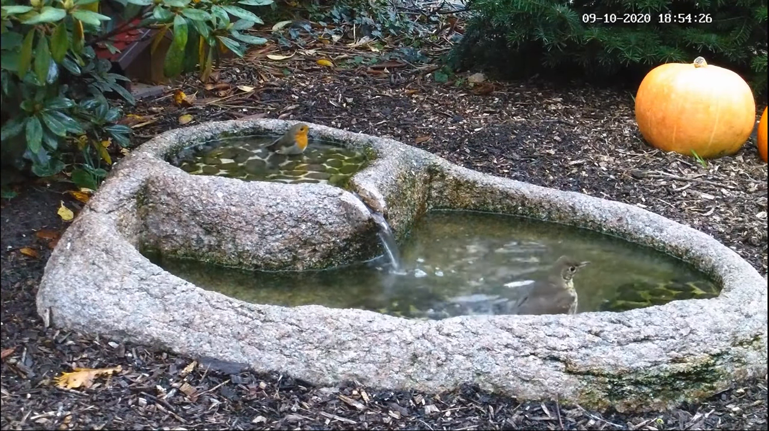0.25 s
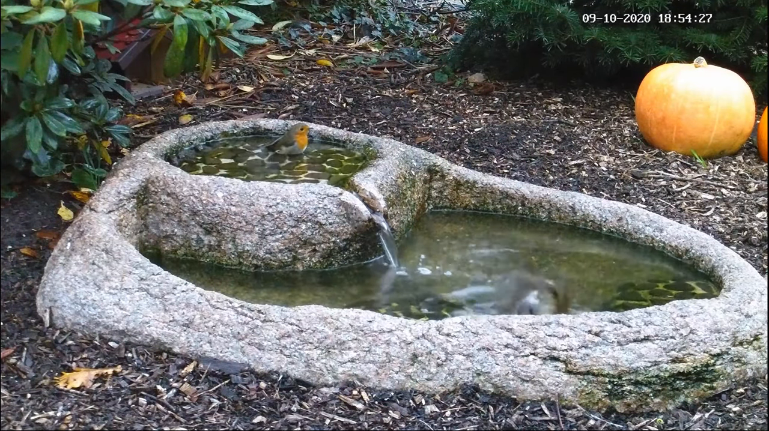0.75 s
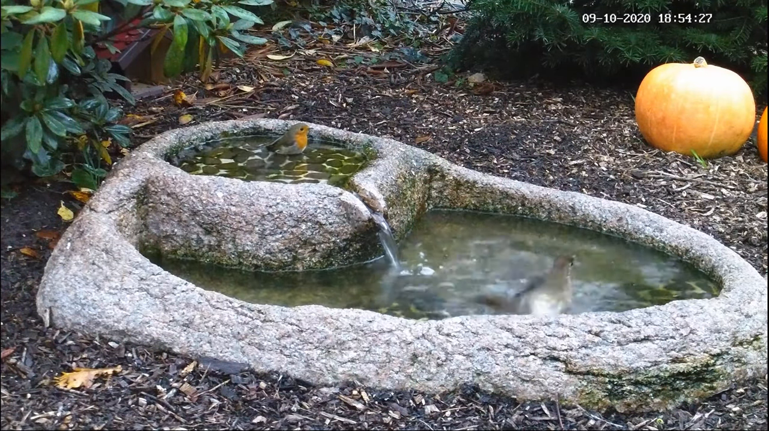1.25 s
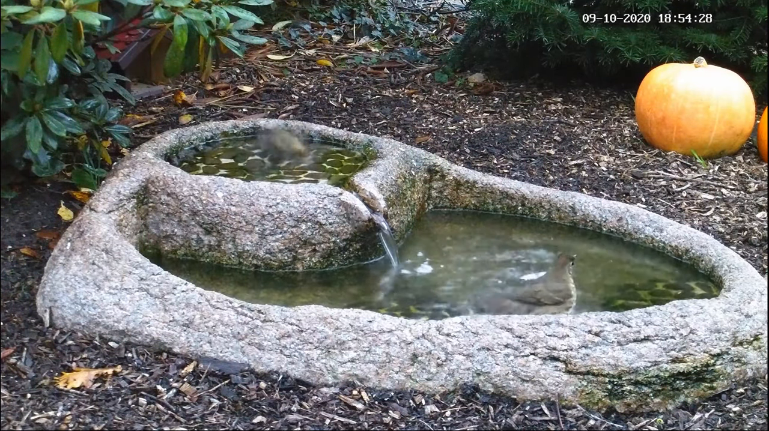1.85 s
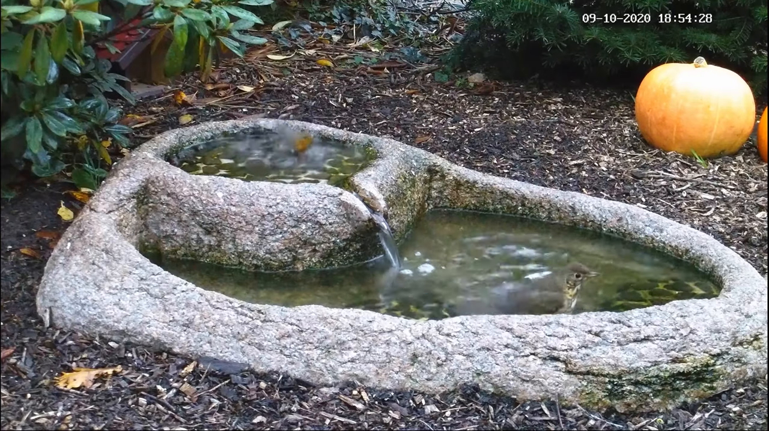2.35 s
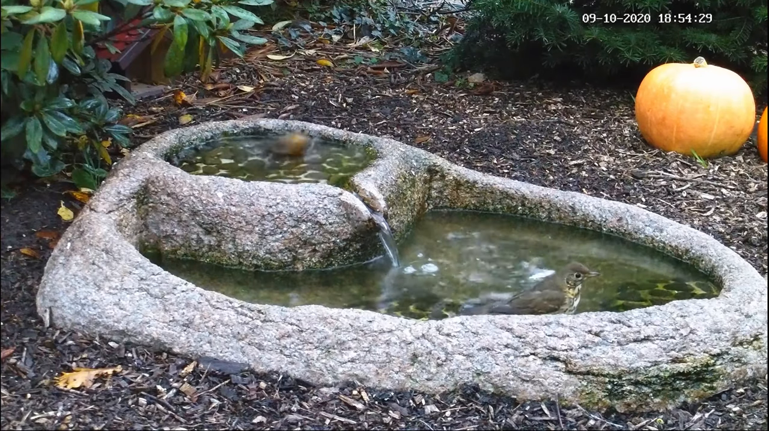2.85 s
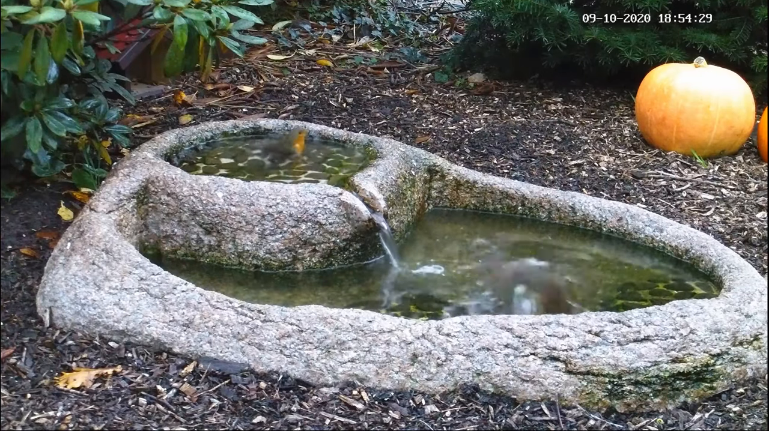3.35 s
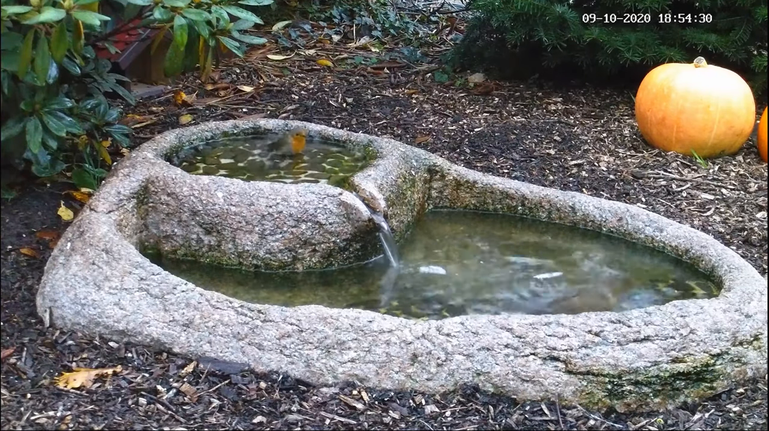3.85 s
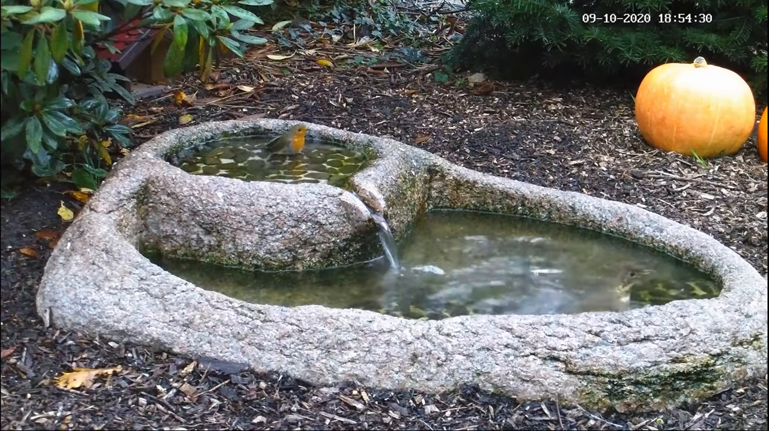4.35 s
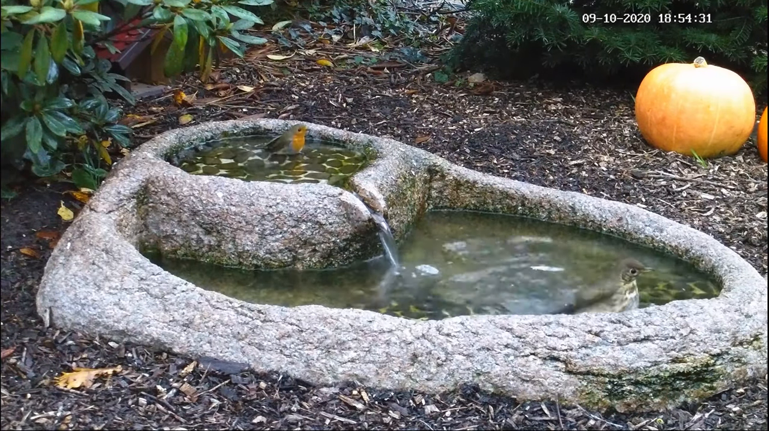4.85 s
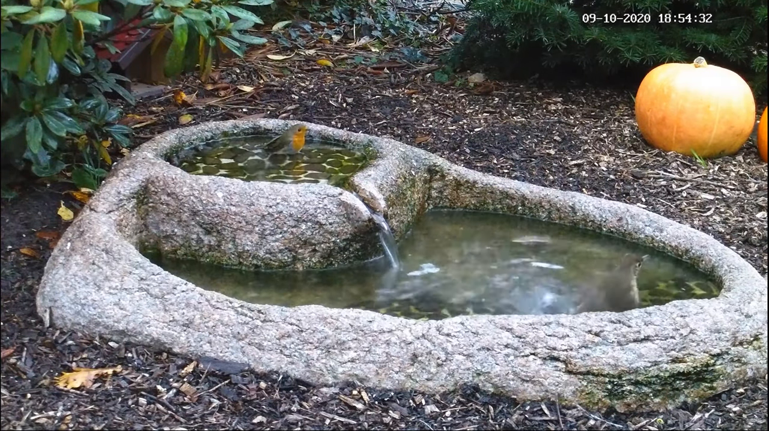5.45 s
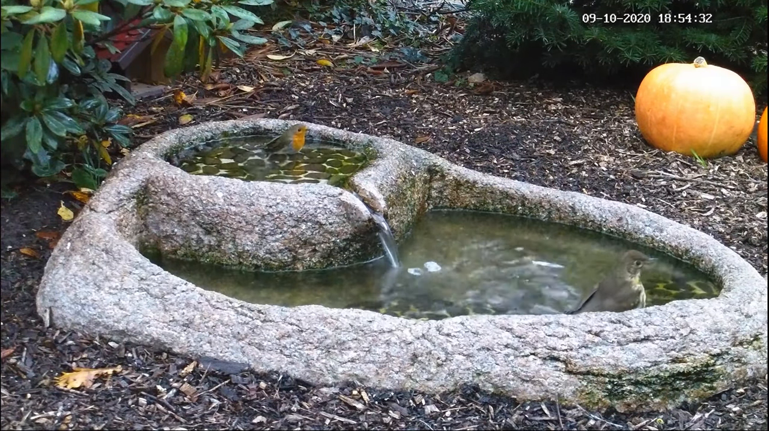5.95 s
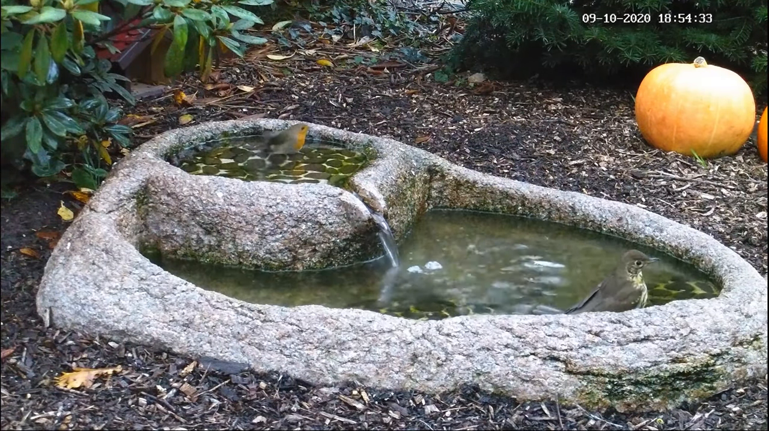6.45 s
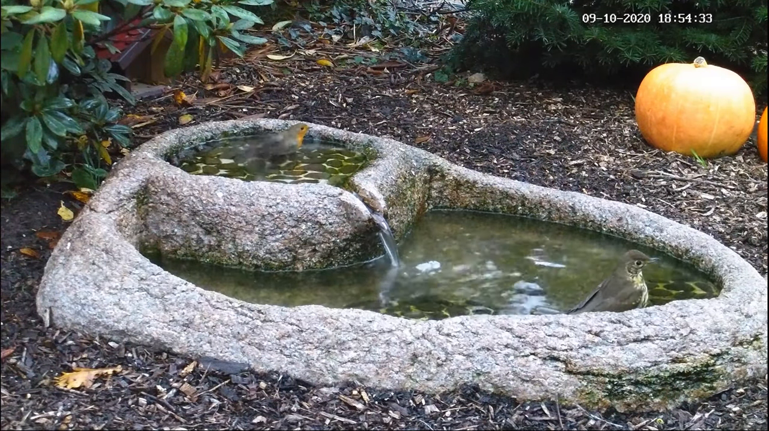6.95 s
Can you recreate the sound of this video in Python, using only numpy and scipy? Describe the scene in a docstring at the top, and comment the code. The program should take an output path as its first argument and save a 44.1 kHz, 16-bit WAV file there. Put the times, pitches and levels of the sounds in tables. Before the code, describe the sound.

Close, steady trickle from a small spout into a stone basin, with ringing plops, crisp ticks and small gurgling bubbles. A bird bathes in short bouts, its wings slapping the water in quick runs, throwing hissing spray and froth, strongest around four seconds. Between bouts only the trickle remains, over soft low traffic rumble and faint bird whistles. Outdoor garden, slightly coloured small camera microphone.

```python
"""Garden, stone bird bath: a thin stream falls from a spout, plopping and ticking, while a bird bathes in bouts.
Stream: ringing bubbles, sharp ticks of noise and ring, rising blips. Bird: noise slaps, spray, froth, sloshes.
Behind: filtered-noise traffic, one engine gaining speed, beating hum tones, faint whistled birds.
Basin echoes the water; a small camera housing colours everything through resonances and a steep low-pass."""
import sys
import numpy as np
from scipy import signal
from scipy.fft import rfft, irfft, next_fast_len
from scipy.io import wavfile
from scipy.ndimage import uniform_filter1d

SR = 44100
rng = np.random.default_rng(int(sys.argv[2]) if len(sys.argv) > 2 else 0)


def dump(signal):
    """Clip the signal to [-1, 1] and save it as 16-bit WAV at the path in sys.argv[1]."""
    limited = np.clip(np.atleast_2d(signal).T, -1, 1)
    pcm = np.round(limited * 32767).astype(np.int16)
    wavfile.write(sys.argv[1], SR, pcm)


N = 317961
TIME = np.arange(N) / SR


def undb(db):
    """Decibels to gain."""
    return 10 ** (np.asarray(db) / 20)


def level(x, db):
    """Set the rms level."""
    return x * undb(db) / np.sqrt(np.mean(x ** 2))


def add(out, t_s, x):
    """Mix x into out at time t_s."""
    i = int(np.clip(t_s * SR, 0, N))
    out[i:i + len(x)] += x[:N - i]


def noise(count=N):
    """White noise."""
    return rng.standard_normal(count)


def walk(rate_hz):
    """Slow random drift with a spread near 1."""
    hold = int(SR / rate_hz)
    steps = np.repeat(noise(N // hold + 1), hold)
    return 1.6 * uniform_filter1d(steps, hold)[:N]


def tone(hz):
    """Sine following a pitch track."""
    return np.sin(2 * np.pi * np.cumsum(hz) / SR)


def butter(x, hz, kind, order=2):
    """Low- or high-pass."""
    return signal.sosfilt(signal.butter(order, hz, kind, fs=SR, output="sos"), x)


def colour(x, points):
    """Minimum-phase filter through f/Hz, gain/dB points."""
    hz, db = np.transpose(points)
    bins_hz = np.arange(N + 1) * SR / (2 * N)
    gain = undb(np.interp(np.log(bins_hz + 1), np.log(hz), db))
    # folded cepstrum makes the response causal
    cepstrum = irfft(np.log(gain))[:N]
    cepstrum[1:] *= 2
    size = next_fast_len(2 * N)
    return irfft(rfft(x, size) * np.exp(rfft(cepstrum, size)), size)[:N]


def echoes(x, t60_s):
    """Scattered reflections that die away, of unit energy."""
    t = TIME[:SR // 2]
    tail = noise(len(t)) * np.exp(-np.log(1000) * t / t60_s) * (1 - np.exp(-t / 0.0029))
    return signal.fftconvolve(x, tail / np.linalg.norm(tail))[:N]


def scatter(grain, per_s, low_hz, high_hz, spread_db):
    """Steady supply of grains at uneven times, of random pitch and strength, most of them weak."""
    out = np.zeros(N)
    for k, (when, size, strength) in enumerate(rng.random((int(per_s * N / SR) + 1, 3))):
        hz = low_hz * (high_hz / low_hz) ** size
        add(out, (k + when) / per_s, undb(spread_db * strength ** 2) * grain(hz))
    return out


def bubble(hz, cycles, glide, onset_cycles):
    """A ring, as of a bubble: swells, rings out over some cycles and slides in pitch."""
    age_cycles = np.arange(int(6 * cycles * SR / hz)) * hz / SR
    pitch_hz = hz * (1 + glide * (1 - np.exp(-age_cycles / (2 * cycles))))
    swell = (1 - np.exp(-(age_cycles / onset_cycles) ** 2)) * np.exp(-age_cycles / cycles)
    return swell / swell.max() * tone(pitch_hz)


PLOP_CLICK_DB = -7  # re bubble


def plop(hz):
    """A large bubble usually sags a little in pitch; the closing cavity gives a small wet click."""
    t = TIME[:SR // 20]
    out = undb(PLOP_CLICK_DB) * noise(len(t)) * np.exp(-t / 0.002)
    glide = -0.08 + 0.011 * rng.standard_normal()
    add(out, 0, bubble(hz * 1.027, cycles=8.9, glide=glide, onset_cycles=1.66)[:len(t)])
    return out


TICK_S = 0.0016  # crack decay


def drop(hz, cycles, crack_db):
    """A drop ticks: high-passed noise cracks while a short steady-pitched tone rings out."""
    t = TIME[:SR // 30]
    crack = noise(len(t)) * (1 - np.exp(-t / 0.0003)) * np.exp(-t / TICK_S)
    out = undb(crack_db) * butter(crack, min(hz * 0.69, 5500), "high", order=4)
    ring = bubble(hz, cycles, glide=0, onset_cycles=1.54)
    add(out, 0, ring[:len(t)])
    return out


# big air pockets pulled under: t/s, relative level/dB, f/Hz
PLOPS = [(0.0323, -47, 1990), (0.196, -42.5, 1940), (0.26, -32, 1430), (0.3836, -43, 1415),
         (0.5, -42.5, 1560), (1.096, -41, 1410), (1.4202, -43, 1430), (1.4676, -41, 1510),
         (1.6347, -43, 2110), (1.7996, -43.5, 1530), (2.0054, -38, 1414), (2.02, -39, 1990),
         (2.107, -37, 1525), (2.2334, -41, 2150), (2.265, -42, 1426), (2.412, -41.5, 2600),
         (2.5432, -41.5, 1476), (2.639, -46, 1493), (2.788, -43.5, 2100), (3.0522, -36.5, 1450),
         (3.3313, -40.5, 1560), (3.5243, -39, 1430), (3.6516, -40.5, 1880), (3.7624, -33.5, 1440),
         (4.2795, -34.5, 1480), (4.692, -34, 1730), (4.8273, -37.5, 1770), (4.8652, -40, 1850),
         (4.9157, -38, 1440), (5.4916, -39, 1960), (5.5344, -40, 1690), (5.5533, -39, 1500),
         (5.6425, -38, 1450), (5.8214, -41.5, 1400), (5.8782, -41, 2040), (5.9705, -44, 1432),
         (6.1765, -44, 2570), (6.1996, -42, 1490), (6.2263, -46, 1490), (6.3315, -40, 1450),
         (6.3767, -42.5, 2560), (6.5962, -37.5, 1410), (6.6742, -35, 2100), (6.6828, -40, 2300),
         (6.9528, -41.5, 1900)]


def plops():
    """The stream pulls big pockets of air under."""
    out = np.zeros(N)
    for t_s, db, hz in PLOPS:
        add(out, t_s, undb(db - 0.5) * plop(hz))
    return out


# sharp ticks, most from the heaviest drops; some thin high ticks sit close to the low-pass edge: # t/s,
# relative level/dB, f/Hz
TICKS = [(0.0131, -31, 9500), (0.1333, -29, 8750), (0.2242, -29.5, 9760), (0.5492, -39, 4000),
         (0.6479, -39, 3720), (0.8375, -29, 12400), (1.082, -30, 12000), (1.189, -25, 11600),
         (1.58, -32, 11800), (1.7025, -33, 7440), (1.8866, -32, 7470), (1.9287, -26.5, 12100),
         (1.955, -28, 11600), (2.1292, -33.5, 5070), (2.3122, -28, 7700), (2.4578, -29, 6000),
         (2.5253, -27.5, 12900), (2.85, -25.5, 10020), (2.9036, -31.5, 6700), (3.0124, -34, 7000),
         (3.1321, -23.5, 11000), (3.2193, -33, 9640), (3.2537, -23, 13200), (3.3954, -32.5, 3560),
         (3.4086, -29, 6070), (3.5398, -29, 6700), (3.8921, -27, 8360), (4.508, -33, 3850),
         (4.5278, -35, 5470), (4.7705, -32.5, 9300), (4.9374, -23, 12400), (5.3804, -27.5, 5760),
         (5.4834, -22, 7400), (5.76, -32, 6100), (5.784, -38, 4260), (5.8007, -36.5, 11860),
         (5.8454, -33.5, 7300), (5.9732, -31.5, 6110), (6.0278, -19.5, 12300), (6.0746, -29, 6000),
         (6.1345, -28, 7000), (6.1734, -32.5, 6200), (6.2351, -26.5, 12130), (6.307, -36.5, 4030),
         (6.3371, -33, 8070), (6.424, -27.5, 7770), (6.6313, -24, 11700), (6.6712, -26.5, 7420),
         (6.8028, -34, 5540), (6.9287, -29.5, 9450)]


def ticks():
    """Sharp ticks, most from the heaviest drops of the stream; each comes back once more off the near stone
    wall."""
    out = np.zeros(N)
    for t_s, db, hz in TICKS:
        sound = undb(db - 5) * drop(hz, cycles=11.8 * np.sqrt(hz / 8000), crack_db=0.5)
        add(out, t_s + 0.0004, sound)
        add(out, t_s + rng.uniform(0.0013, 0.0028), undb(0.5) * sound)
    return out


# clear rising bubbles: t/s, length/s, start f/Hz, end f/Hz, relative level/dB
BLIPS = [(0.11, 0.016, 2800, 5170, -38), (1.802, 0.031, 2040, 2760, -39), (1.827, 0.026, 2170, 2750, -35),
         (1.881, 0.024, 2240, 2880, -34.5), (2.62, .05, 1434, 1510, -35.5), (4.12, 0.013, 2100, 2460, -31),
         (4.734, 0.023, 3570, 4430, -33), (6.205, 0.081, 1480, 1495, -38),
         (6.516, 0.024, 1370, 1670, -33.5), (6.596, 0.017, 2540, 3270, -37), (6.638, .011, 4400, 5000, -31),
         (6.683, 0.018, 2340, 3480, -32), (6.725, 0.01, 2760, 3560, -30)]


def blips():
    """A bubble nearing the surface chirps upward."""
    out = np.zeros(N)
    for t_s, length_s, start_hz, end_hz, db in BLIPS:
        hz = np.geomspace(start_hz, end_hz, int(length_s * SR))
        add(out, t_s, undb(db - 14.5) * np.hanning(len(hz)) * tone(hz))
    return out


GURGLES_PER_S, TINKLES_PER_S = 26, 14
GURGLE_DB, TINKLE_DB = -65, -59  # rms


def gurgle_grain(hz):
    """Either a plop or a softer bubble without a click, at even odds."""
    if rng.random() < 0.5:
        return plop(hz)
    return bubble(hz, cycles=7.5, glide=rng.uniform(-0.1, 0.23), onset_cycles=1.4)


def tinkle_grain(hz):
    """A small drop with a stronger crack."""
    return drop(hz, cycles=5, crack_db=4)


def trickle():
    """Under the stream soft bubbles gurgle and small drops tick, at chance times."""
    gurgle = scatter(gurgle_grain, GURGLES_PER_S, low_hz=1393, high_hz=2740, spread_db=9)
    tinkle = scatter(tinkle_grain, TINKLES_PER_S, low_hz=4400, high_hz=10500, spread_db=9)
    return level(gurgle, GURGLE_DB) + level(tinkle, TINKLE_DB)


# wing beats: t/s, relative levels/dB of smack, cavity gulp, low thud
SLAPS = [(0.608, -30.5, -50, -60), (0.6902, -27, -60, -46), (0.848, -31, -45.5, -44.5),
         (1.132, -28, -41.5, -43), (1.2099, -28, -40.5, -43.5), (1.283, -23, -37.5, -41),
         (1.358, -24.5, -36.5, -38), (3.3662, -33, -59, -53), (3.453, -23.5, -59, -55),
         (3.485, -33.5, -46, -63), (4.0222, -25.5, -33.5, -36), (4.0953, -20, -32.5, -43.5),
         (4.1615, -21.5, -34, -43), (4.2296, -17.5, -33.5, -42), (4.303, -21, -30, -39),
         (4.3768, -22, -39, -43), (4.586, -37, -43, -43), (4.681, -22, -40.5, -43.5),
         (4.994, -31.5, -40, -46), (5.0603, -27, -39, -39), (5.1252, -23, -40.5, -42.5),
         (5.1943, -23.5, -39.5, -40.5), (5.2707, -26.5, -48, -43), (5.3505, -23.5, -38.5, -44),
         (5.447, -32.5, -47.5, -58), (7.1465, -42, -39, -57), (7.1942, -31.5, -46, -59)]
# smack and gulp spectrum: f/Hz, gain/dB
SLAP_COLOUR = [(590, -31), (1000, -27), (1150, -16), (1540, 2), (2370, -4), (2660, -4), (5150, -1.5),
               (12300, -1.5), (16000, -31), (22000, -120)]
# thud spectrum: f/Hz, gain/dB
THUD_COLOUR = [(80, -15), (190, -11.5), (280, -1.5), (350, -12), (440, -1.5), (550, -7), (790, 4),
               (950, -0.5), (1200, -27.5), (3000, -34)]


def slaps():
    """A wing brushes the water, smacks it and leaves a short wash; gulp and thud vary per stroke."""
    smack, gulp, thud = np.zeros((3, N))
    t, lead_s = TIME[:SR // 10], 0.005
    brush = undb(-16.5) * np.linspace(0.2, 1, int(lead_s * SR))
    decay = np.exp(-t / 0.0038) + undb(-21) * np.exp(-t / 0.016)
    shape = np.r_[brush, (1 - np.exp(-t / 0.0005)) * decay]
    count = len(shape)
    for t_s, smack_db, gulp_db, thud_db in SLAPS:
        # the sheet of water tears unevenly
        tearing = undb(2 * np.repeat(noise(count), 30)[:count])
        add(smack, t_s - lead_s, undb(smack_db) * shape * tearing * noise(count))
        add(gulp, t_s - lead_s, undb(gulp_db) * shape * noise(count))
        cavity = bubble(rng.uniform(1290, 1540), cycles=1.7, glide=0.019, onset_cycles=3)
        add(gulp, t_s, undb(gulp_db - 10) * cavity)
        add(thud, t_s - lead_s, undb(thud_db) * shape * noise(count))
    smack = butter(smack, 2000, "high")
    gulp = butter(butter(gulp, 980, "high"), 1900, "low")
    upper = colour(undb(1) * smack + undb(18) * gulp, SLAP_COLOUR)
    return upper + undb(18.5) * colour(thud, THUD_COLOUR)


# bouts throwing spray: t/s, length/s, spray level/dB, froth level re spray/dB
BOUTS = [(0.69, 0.2, -48.5, -5.5), (1.214, 0.21, -55, -5.5), (1.95, .19, -55, -9.5),
         (2.413, 0.17, -58, -8.5), (3.334, .17, -50.5, -4), (4.01, 0.46, -56.5, -4), (4.686, 0.13, -59, -4),
         (5.059, 0.35, -54.5, -9), (6.513, 0.21, -60.5, -6)]
SPRAY_RISE_DB_PER_S, SPRAY_FALL_DB_PER_S = 56, 73  # bird works up; spray rains back
STREAM_SPRAY_DB, STREAM_FROTH_DB = -64.5, -5  # constant spatter; its froth re that


def bathing():
    """Spray and froth levels in dB: each bout rises, holds and dies back into the stream's spatter."""
    spray_db, froth_db = STREAM_SPRAY_DB, STREAM_SPRAY_DB + STREAM_FROTH_DB
    for t_s, length_s, db, foam_db in BOUTS:
        before_s = np.maximum(t_s - TIME, 0)
        after_s = np.maximum(TIME - t_s - length_s, 0)
        bout_db = db - SPRAY_RISE_DB_PER_S * before_s - SPRAY_FALL_DB_PER_S * after_s
        spray_db = np.maximum(spray_db, bout_db)
        froth_db = np.maximum(froth_db, bout_db + foam_db)
    return spray_db, froth_db


# droplet hiss spectrum: f/Hz, gain/dB
SPRAY_COLOUR = [(710, -32), (1200, 0), (1490, 9), (2990, -11), (3630, 9), (4510, -28), (4880, 10),
                (10400, 7), (12500, 12.5), (16200, -49), (22000, -120)]
DROPLETS_PER_S, SPRAY_THINNING = 3600, 0.45  # at the loudest; dB of rate lost per dB of level


def froth_grain(hz):
    """A quick-onset bubble gliding slightly up."""
    return bubble(hz, cycles=10, glide=0.085, onset_cycles=0.52)


def spray():
    """Droplets thrown by the feathers patter back and froth the pool, thickest during each bout."""
    spray_db, froth_db = bathing()
    density = undb(SPRAY_THINNING * (spray_db - spray_db.max()))
    hits = rng.random(N) < DROPLETS_PER_S * density / SR
    drops = hits * undb(10 * np.minimum(rng.exponential(size=N), 3.5))
    # each droplet gives a millisecond of hiss; dividing by density evens out the mean power
    decay = np.exp(-TIME[:SR // 200] / 0.001)
    power = signal.fftconvolve(drops ** 2 / density, decay)[:N].clip(0)
    patter = colour(power ** 0.5 * noise(), SPRAY_COLOUR)
    froth = scatter(froth_grain, per_s=700, low_hz=1384, high_hz=6000, spread_db=20)
    return level(patter, 0) * undb(spray_db) + level(froth, 0) * undb(froth_db)


# body dips: t/s, length/s, level/dB
SLOSHES = [(0.678, 0.32, -60), (3.457, 0.2, -53), (3.912, 0.08, -53)]


def sloshes():
    """Water displaced by the bird's body washes softly against the stone: swelling band noise."""
    out = np.zeros(N)
    for t_s, length_s, db in SLOSHES:
        add(out, t_s, undb(db) * np.hanning(int(length_s * SR)))
    wash = butter(butter(noise(), 760, "high", order=4), 980, "low", order=4)
    return out * level(wash * undb(2.2 * walk(49)), 0)


# faint bird whistles: t/s, length/s, start f/Hz, end f/Hz, relative level/dB
CHIRPS = [(0.157, 0.15, 3690, 4290, -67), (0.39, 0.045, 4500, 4450, -75), (2.747, 0.17, 8900, 8400, -65),
          (2.8, 0.091, 7500, 6800, -65), (4.754, 0.22, 4070, 3530, -64), (6.2, 0.14, 3960, 4600, -68),
          (6.49, 0.057, 4370, 4480, -66)]


def birds():
    """Thin twittering whistles, blurred by the trees."""
    out = np.zeros(N)
    for t_s, length_s, start_hz, end_hz, db in CHIRPS:
        count = int(length_s * SR)
        hz = np.linspace(start_hz, end_hz, count) * (1 + 0.025 * walk(160)[:count])
        twitter = np.hanning(count) ** 0.5 * np.abs(walk(70)[:count])
        add(out, t_s, undb(db) * twitter * tone(hz))
    return undb(-7) * out + undb(-2) * echoes(out, t60_s=0.5)


# road noise spectrum: f/Hz, gain/dB
AIR = [(20, -18), (45, 0), (70, 0.5), (110, -5.5), (160, -4), (210, -10), (270, -6), (350, -20),
       (520, -11.5), (800, -0.5), (950, 1), (1200, -12), (3000, -31), (12500, -27.5)]


def traffic():
    """Far road noise: coloured noise drifting slightly in level."""
    return level(colour(noise(), AIR), -58) * undb(0.19 * walk(1.53))


# far engine gathering speed: t/s, f/Hz, relative level/dB
ENGINE = [(4.5, 64, -75), (5.2, 70.4, -61), (6, 76.6, -62), (6.5, 80.7, -59.5), (7.21, 83.3, -66.5)]


def engine():
    """One far engine speeds up: a low sine rising in pitch."""
    t_s, hz, db = np.transpose(ENGINE)
    gain = undb(np.interp(TIME, t_s, db, left=-120) - 3)
    return gain * tone(np.interp(TIME, t_s, hz))


# machine hum tones: f/Hz, relative level/dB
HUM = [(48.6, -62.5), (49.72, -68.5), (133, -75.5)]


def machine_hum():
    """Steady tones wandering together; the two lowest beat slowly."""
    wander = np.cumsum(0.5 * walk(5.4)) / SR
    return sum(undb(db) * np.sin(2 * np.pi * (hz * (TIME - 0.15) + wander)) for hz, db in HUM)


def scene():
    """The water sounds in its stone basin, in the open garden."""
    stream = plops() + blips() + ticks() + trickle()
    bather = slaps() + spray() + sloshes()
    water = stream + bather
    basin = undb(-15.5) * echoes(water, t60_s=0.048)
    background = undb(2) * (traffic() + engine() + machine_hum())
    return (water + basin + birds() + background)[None]


# housing peaks and dips: f/Hz, width/Hz, gain/dB
HOUSING = [(1170, 150, -3), (2330, 200, -2), (2660, 180, 3), (3120, 400, -3), (3700, 130, 4),
           (3900, 120, -4), (4120, 130, 7), (4420, 200, -3), (4900, 200, 3), (5280, 180, -3),
           (5850, 170, -5), (6100, 160, 4), (6650, 200, 3), (7000, 200, -3), (7350, 200, 2), (7750, 250, 2),
           (9200, 300, -3), (9820, 300, 4), (11900, 500, 2)]
DIP_START_S, DIP_END_S, DIP_DB = 0.592, 0.607, -25.5
TOP_HZ = 12490


def record(dry):
    """The housing colours the sound; the level drops once, briefly; the top is cut off."""
    out = dry
    for hz, width_hz, db in HOUSING:
        band = signal.lfilter(*signal.iirpeak(hz, hz / width_hz, fs=SR), out)
        out = out + (undb(db) - 1) * band
    out = out * np.where((TIME > DIP_START_S) & (TIME < DIP_END_S), undb(DIP_DB), 1)
    return signal.sosfilt(signal.ellip(10, 0.2, 70, TOP_HZ, fs=SR, output="sos"), out)


dry = scene()
out = record(dry)
dump(out)
```